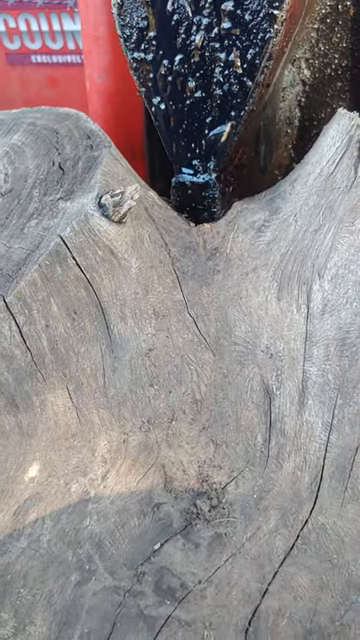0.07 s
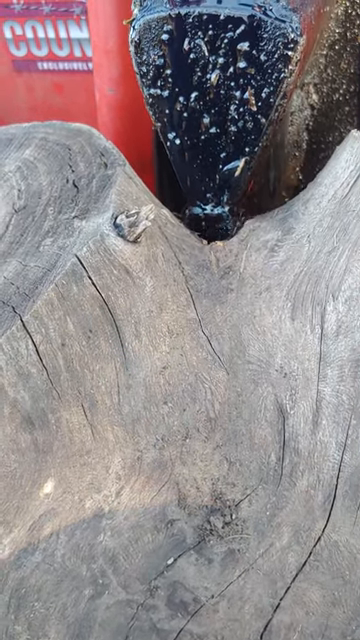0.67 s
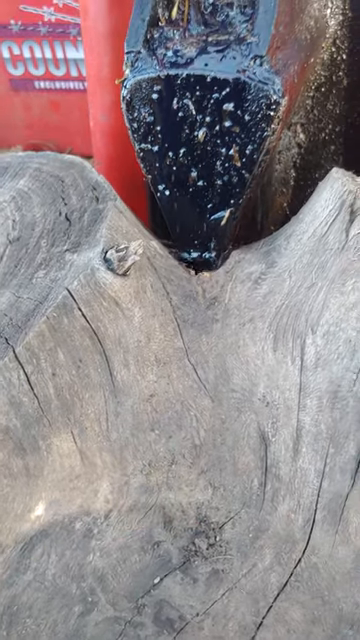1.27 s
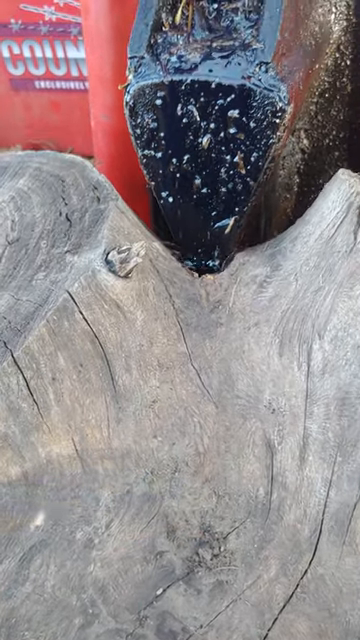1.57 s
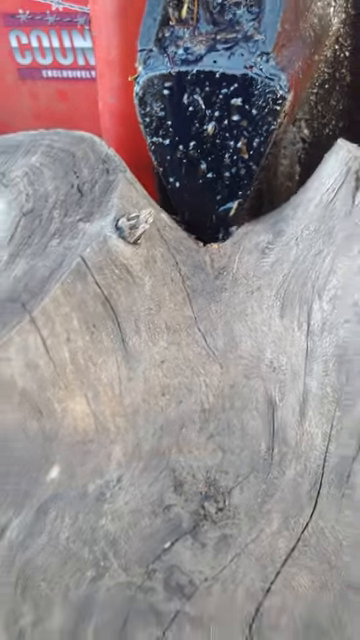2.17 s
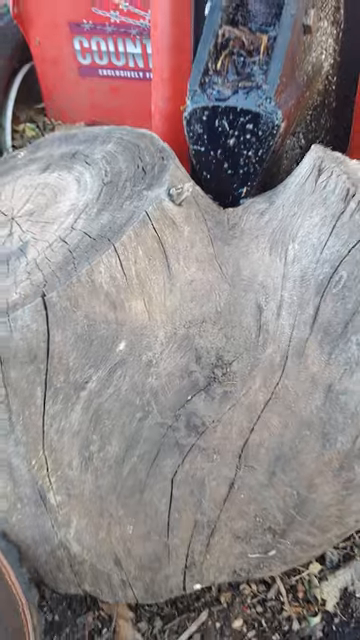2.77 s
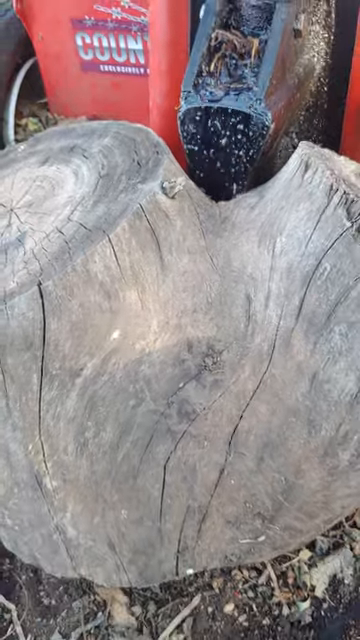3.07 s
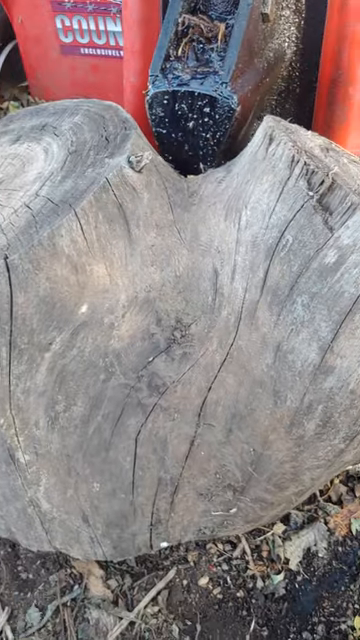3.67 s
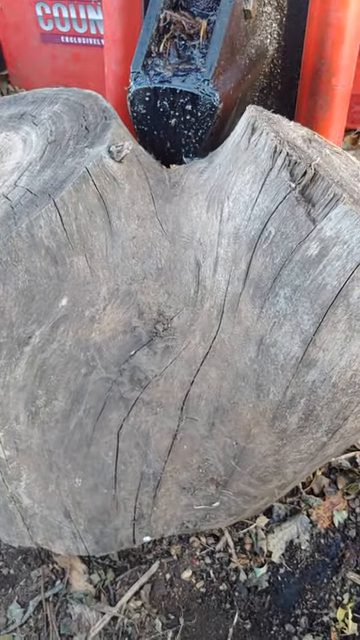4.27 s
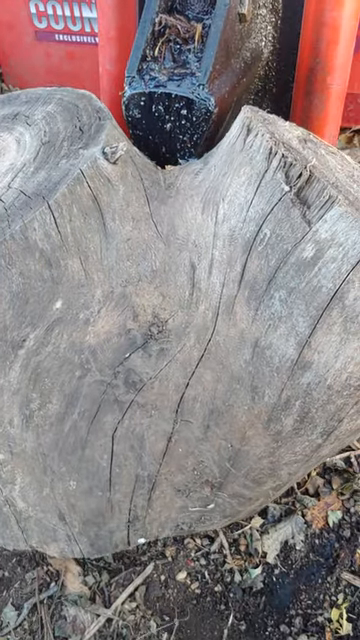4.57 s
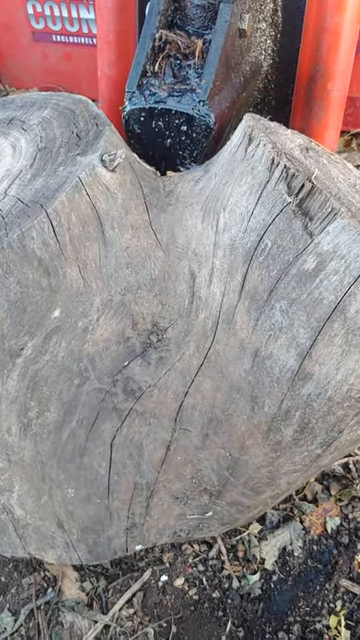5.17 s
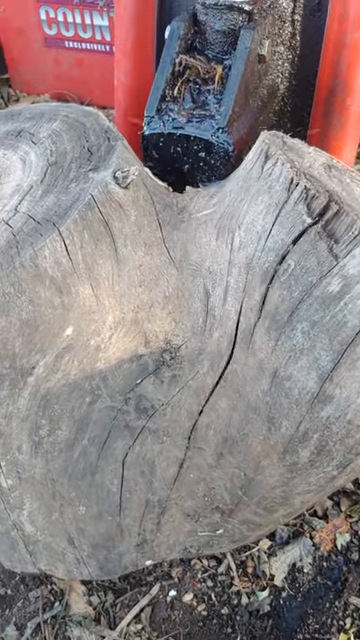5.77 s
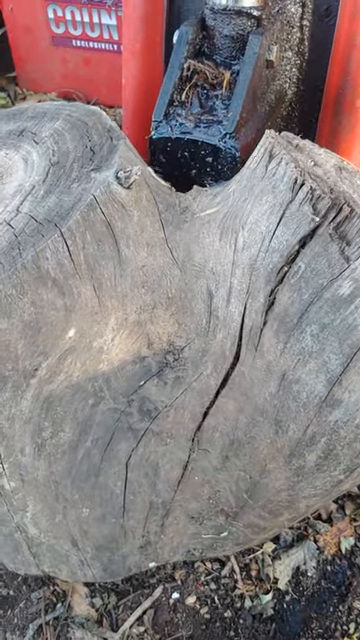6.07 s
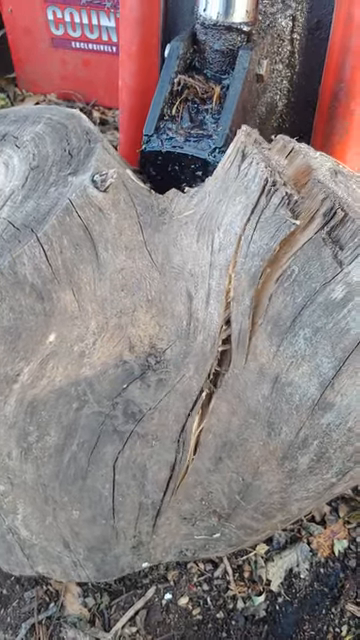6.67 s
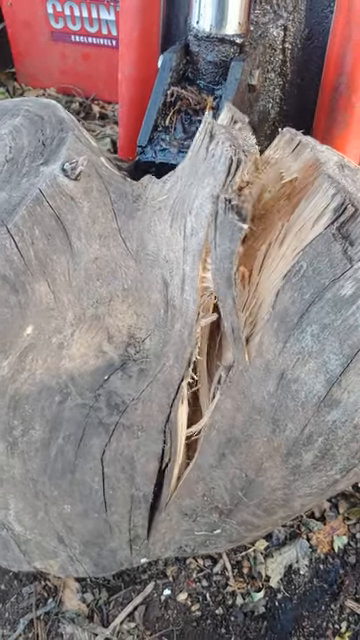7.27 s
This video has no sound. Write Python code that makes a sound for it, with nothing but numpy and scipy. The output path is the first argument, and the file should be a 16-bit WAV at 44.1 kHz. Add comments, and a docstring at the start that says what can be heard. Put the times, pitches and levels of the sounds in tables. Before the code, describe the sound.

A single-cylinder petrol engine runs close by outdoors from start to finish, a steady throbbing drone with mechanical clatter and a faint hydraulic pump whine. From the start, a dry log gives separate sharp cracks and small ticks as the splitter's wedge sinks in, clearest at about 0.4, 1.3, 3 and 4.2 seconds. Around 2.5 seconds the engine turns boomier and the whine recedes. At about 4.7 seconds a loud crack bursts the log open, and a dense crackle of snapping, tearing fibres follows. The whine rises again around 5.5 seconds. The loudest splintering crack and rip come at about 6.6 seconds, with more strong snaps and tearing from 6.8 seconds until the end, near 7.4 seconds. The biggest cracks briefly duck the engine, which then swells back.

```python
"""Petrol log splitter, close up

A single-cylinder engine drones and clatters outdoors, its hydraulic pump whining as the wedge sinks in.
The log gives single cracks, then bursts and tears with a dense crackle of snapping fibres.
Loud cracks make a limiter duck the engine, which swells back."""
import sys
import numpy as np
from scipy import signal
from scipy.fft import rfft, irfft, next_fast_len
from scipy.io import wavfile
from scipy.ndimage import uniform_filter1d, minimum_filter1d, map_coordinates

SR = 44100
rng = np.random.default_rng(int(sys.argv[2]) if len(sys.argv) > 2 else 0)


def log_audio(samples):
    """Write samples as a 16-bit WAV file to the path given in sys.argv[1]."""
    # one column per channel
    frames = np.atleast_2d(samples).T
    # limit to full scale, then quantise
    limited = np.clip(frames, -1, 1)
    pcm = np.round(limited * 32767).astype(np.int16)
    wavfile.write(sys.argv[1], SR, pcm)


N = 327222
BURST_S = 4.8  # the log bursts open


def amp(db):
    """Decibels to gain."""
    return 10 ** (np.asarray(db) / 20)


def unit(x):
    """Scale to rms 1."""
    return x / np.sqrt(np.mean(x ** 2) + 1e-20)


def along(points, hz):
    """Read (frequency, value) points on a log-frequency axis."""
    freqs, values = np.transpose(points)
    return np.interp(np.log(hz + 1), np.log(freqs + 1), values)


def automation(rows):
    """One lane, a value per sample, for each column after the time."""
    times, *lanes = np.transpose(rows)
    return [np.interp(np.arange(N) / SR, times, lane) for lane in lanes]


def wobble(rate):
    """Smooth random modulation, rate knots a second."""
    knots = rng.standard_normal(int(N * rate / SR) + 4)
    coarse = np.arange(0, N + 64, 64)
    return np.interp(np.arange(N), coarse, map_coordinates(knots, [coarse * rate / SR]))


def filtered(x, response):
    """Filter x by a gain given as a function of frequency."""
    n = x.shape[-1]
    padded = next_fast_len(n + n // 8)
    return irfft(rfft(x, padded) * response(np.fft.rfftfreq(padded, 1 / SR)), padded)[..., :n]


def eq(x, curve):
    """Shape x with a (frequency, level) curve."""
    return filtered(x, lambda hz: amp(along(curve, hz)))


def bell(hz, centre_hz, octaves):
    """A bell of height 1 on a log-frequency axis."""
    return np.exp(-.5 * (np.log2((hz + 1) / centre_hz) / octaves) ** 2)


# tone colour of the left channel, with a deep dip near 8 kHz: (frequency [Hz], gain [dB])
LEFT_EQ = [(60, 3), (200, 0), (400, -0.5), (700, 6.5), (1100, 3), (1900, -7.5), (3000, -4), (4400, -3.5),
           (5400, -1), (7000, -15), (8300, -40), (10000, -10.5), (11700, -5.5), (13500, -17)]
# tone colour of the right channel, with a peak near 7 kHz: (frequency [Hz], gain [dB])
RIGHT_EQ = [(60, -0.2), (200, 1.5), (400, 2), (700, -1.5), (1100, 3), (1900, 2), (3000, -1.5), (4300, 3.5),
            (5600, -3), (7200, 15), (8000, -1.5), (8800, -31), (10000, -1.5), (11500, 7.5)]
def channel_tone(hz):
    """Gains of the left and right channels."""
    return amp([along(LEFT_EQ, hz), along(RIGHT_EQ, hz)])


# likeness of left and right: (frequency [Hz], correlation [-1..1])
CORRELATION = [(150, 1), (350, 0.69), (700, 0.24), (1400, -0.15), (12000, 0.19)]
def width(hz):
    """Mid/side angle in radians: mono in the bass, wide above."""
    return np.arccos(np.clip(along(CORRELATION, hz), -1, 1)) / 2


def stereo(pair):
    """Two unrelated signals become mid and side; each channel then gets its own tone."""
    mid, side = filtered(pair, lambda hz: np.array([np.cos(width(hz)), np.sin(width(hz))]))
    return filtered(np.array([mid + side, mid - side]), channel_tone)


# exhaust note: (harmonic [x firing rate], relative level [dB])
EXHAUST_HARMONICS = [(1, -21), (2, -4.5), (3, -19), (4, -15), (5, 1.5), (6, -11.5), (7, -10), (8, -7),
                     (9, -17.5), (10, -14.5), (11, -16), (12, -7.5), (13, -33), (14, -21.5), (15, -11.5),
                     (16, -24), (17, -28), (18, -19.5), (19, -25), (20, -31.5), (21, -19.5), (22, -25.5),
                     (23, -53)]
def exhaust(cycle, mean_rate, boom_db, drone_db, level_db, smear_rad, waver_db):
    """Firing harmonics; the muffler delays high ones more, smearing each pulse over the cycle."""
    out = np.zeros((2, N))
    firing_strength = wobble(27)  # no two firings are equally strong
    for order, db in EXHAUST_HARMONICS:
        hz = order * mean_rate
        body_db = boom_db * bell(hz, 333, 0.34) + drone_db * bell(hz, 526, 0.2)
        waver = firing_strength + wobble(9) * hz / 300
        gain = amp(level_db + db + body_db + waver_db * waver)
        phase = 2 * np.pi * order * cycle - smear_rad * order ** 2
        apart = width(hz)  # higher harmonics reach left and right out of step
        out += channel_tone(np.array([hz])) * gain * np.sin([phase + apart, phase - apart])
    return out


# low engine noise: (frequency [Hz], relative level [dB])
RUSH_EQ = [(25, -22), (70, -5), (140, -2), (300, 1), (450, -3.5), (700, -12.5), (1000, -17.5), (2000, -49)]
def rush(cycle, level_db, throb_db):
    """A rough low rush that throbs once per firing."""
    noise = unit(stereo(eq(rng.standard_normal((2, N)), RUSH_EQ)))
    return noise * amp(level_db + throb_db * np.cos(2 * np.pi * cycle))


# engine cover resonances: (frequency [Hz], bandwidth [Hz], relative level [dB])
COVER_MODES = [(1320, 14, 13), (2310, 330, 0.5), (3370, 106, 1), (3860, 43, -1), (4590, 49, 5),
               (5800, 110, -4), (7300, 700, -35)]
def covers(hz):
    """Response of the ringing covers: resonators of alternating polarity."""
    return sum((-1) ** k * amp(db) * 1j * hz * band / (centre ** 2 - hz ** 2 + 1j * hz * band)
               for k, (centre, band, db) in enumerate(COVER_MODES))


# mechanical rattle: (frequency [Hz], relative level [dB])
CLATTER_EQ = [(450, -21), (700, -4), (830, -7), (1100, -8), (1500, -13.5), (2100, -3.5), (3000, -12.5),
              (3900, -10.5), (4600, -21.5), (5500, -23.5), (7100, -27.5), (8200, -31.5), (11500, -37),
              (16000, -53)]
def clatter(cycle, mean_rate, level_db, repeat, throb_db, ring_db):
    """Valve gear, piston and pump rattle nearly alike each cycle; fan air and ringing covers join in."""
    period = int(SR / mean_rate)
    loop = signal.resample(rng.standard_normal((2, period)), 4 * period, axis=1)
    playhead = (cycle % 1 * loop.shape[1]).astype(int)
    looped = loop[:, playhead] * amp(1.03 * wobble(30))
    loop_share = lambda hz: repeat / (1 + (hz / 3200) ** 2)
    fan_air = filtered(rng.standard_normal((2, N)), lambda hz: np.sqrt(1 - loop_share(hz)))
    rattle = filtered(looped, lambda hz: np.sqrt(loop_share(hz))) + fan_air
    throb = np.cos(2 * np.pi * cycle) + np.cos(4 * np.pi * cycle)  # one firing, two crank turns
    rattle *= amp(throb_db * throb + 1.1 * wobble(160))
    ring = amp(ring_db) * unit(filtered(rattle[::-1], covers))
    return amp(level_db) * unit(stereo(unit(eq(rattle, CLATTER_EQ)) + ring))


# whine riding the pump's load: (time [s], level [dB])
PUMP_LOAD = [(0, -26), (2.4, -27.5), (2.9, -35), (5.3, -39.5), (5.6, -24.5), (6.3, -29), (7.0, -23)]
# gear mesh, sidebands and octave: (harmonic [x firing rate], relative level [dB])
GEAR_TONES = [(24, 0), (25, -9), (26, -7), (27, -15), (48, -19)]
def pump(cycle, flutter_db):
    """Twelve gear teeth mesh on each of a cycle's two crank turns, louder as the oil pressure rises."""
    whine_db, = automation(PUMP_LOAD)
    whine = sum(amp(db + flutter_db * wobble(30)) * np.sin(2 * np.pi * order * cycle)
                for order, db in GEAR_TONES)
    return filtered(amp(whine_db) * whine, channel_tone)


def close_notch(x, boom_db, notch_hz, octaves, depth):
    """Near the wedge, where the boom is weak, a narrow band of machine noise dips too."""
    closeness = np.clip(boom_db / boom_db.min(), 0, 1)
    return x - depth * closeness * filtered(x, lambda hz: bell(hz, notch_hz, octaves))


# governed engine speed: (time [s], firing rate [Hz])
FIRING_RATE = [(0.0, 27.4), (0.16, 27.4), (0.58, 27.2), (1.14, 27.5), (1.45, 27.0), (1.71, 27.4),
               (1.92, 27.4), (2.0, 27.2), (3.08, 27.1), (3.22, 27.3), (3.37, 27.0), (5.04, 27.0),
               (6.65, 27.7), (6.82, 27.9), (7.15, 27.0), (7.34, 27.0), (7.42, 27.6)]
# the microphone steps back once: (time [s], frame boom [dB], housing drone [dB], clatter [dB])
PERSPECTIVE = [(0, -6.5, 8, -25), (2.4, -7, 8, -25.5), (2.8, 2.5, 1.5, -24.5), (7.4, 2, -4.5, -24.5)]
def engine():
    """A governed four-stroke: exhaust, rush, clatter and pump all lock to its firing cycle."""
    rate, = automation(FIRING_RATE)
    mean_rate = np.mean(FIRING_RATE, axis=0)[1]
    boom_db, drone_db, clatter_db = automation(PERSPECTIVE)
    cycle = np.cumsum(rate * (1 + .0012 * wobble(20))) / SR
    note = exhaust(cycle, mean_rate, boom_db, drone_db, level_db=-13, smear_rad=.62, waver_db=0.69)
    machine = rush(cycle, level_db=-29.5, throb_db=3)
    machine += clatter(cycle, mean_rate, clatter_db + 4, repeat=0.81, throb_db=0.45, ring_db=-10.5)
    machine += pump(cycle, flutter_db=1.5)
    return note + close_notch(machine, boom_db, notch_hz=756, octaves=0.12, depth=0.54)


# the log's brief ring: (frequency [Hz], relative level [dB], 60 dB decay [s])
LOG_MODES = [(1575, -6.5, 0.036), (2067, -7.5, 0.052), (2470, -4, 0.081), (3406, 0.5, 0.048),
             (4370, -1, 0.016)]
def log_ring(t, level_db):
    """Each splinter has its own size and strikes the damped log's modes anew."""
    detune = np.exp(0.032 * rng.standard_normal())
    ring = np.zeros((2, len(t)))
    for hz, db, t60 in LOG_MODES:
        strike_db = level_db + db + 4.2 * rng.standard_normal((2, 1))
        ring += amp(strike_db - 60 * t / t60) * np.sin(2 * np.pi * hz * detune * t)
    return ring * rng.choice([-1, 1], (2, 1))


# breaking wood: (frequency [Hz], relative level [dB])
WOOD_EQ = [(150, 2), (600, -0.5), (1200, -1.5), (2000, 6), (3200, -2), (4400, -1), (5600, -8.5),
           (7200, -6.5), (11500, -14), (16000, -18.5)]
PRE_ROLL = SR // 200  # samples of room before each attack
def crack(force_db, centre_hz, focus_db, knock_db, tail_db, tail_t60, drive):
    """A short run of snapping fibres rings the log; the steel frame answers with a faint tail."""
    t = np.arange(SR // 5) / SR
    delayed = lambda x: np.pad(x, ((0, 0), (PRE_ROLL, 0)))
    burst = lambda envelope: delayed(envelope * rng.standard_normal((2, len(t))))
    t60 = 0.033 * (3000 / centre_hz) ** 1.75  # thinner splinters sound higher and stop sooner
    jagged_db = 5 * unit(uniform_filter1d(rng.standard_normal(len(t)), size=24))
    depth = np.clip(force_db / 18, 0, 1) * 2500 / centre_hz  # a big, low crack knocks the whole log
    colour = lambda hz: amp(along(WOOD_EQ, hz) + focus_db * bell(hz, centre_hz, 0.89)
                            + knock_db * depth * bell(hz, 550, 0.58))
    ring = delayed(log_ring(t, level_db=-18.5))
    snap = filtered(burst(amp(jagged_db - 60 * t / t60)) + ring, colour)
    tail = burst(amp(tail_db + 5 * depth - 60 * t / tail_t60))
    tail = filtered(tail, lambda hz: colour(hz) / (1 + (hz / 3500) ** 2))
    hit = stereo(snap + tail)
    hit /= np.sqrt(uniform_filter1d(hit ** 2, size=110, axis=1).max())
    return np.tanh(drive * hit)  # rounds off the sharpest spikes


def small_cracks(start_s, end_s, mean_db, count):
    """Cues for small cracks, one in each equal slot of the span, scattered in level and pitch."""
    when, size, pitch = rng.random((count, 3)).T
    times = start_s + (end_s - start_s) * (np.arange(count) + when) / count
    levels_db = mean_db + 3.5 * (2 * size - 1)
    centres_hz = 3560 * 2 ** (0.3 * (2 * pitch - 1))
    return list(zip(times, levels_db, centres_hz))


# the main cracks: (time [s], relative level [dB], centre frequency [Hz])
CRACK_CUES = [(0.018, -3.5, 3300), (0.363, 7.5, 4400), (0.848, 2, 2140), (0.999, 2.5, 2900),
              (1.270, -1, 2580), (1.277, 7.5, 2870), (1.569, 4.5, 3070), (1.644, -2.5, 2900),
              (1.724, -3, 4200), (2.019, 0.5, 2700), (2.792, -5, 2400), (3.019, 6, 2680), (3.334, 3, 2400),
              (3.973, -4, 2980), (4.155, 5, 2430), (4.740, 4, 2510), (4.745, 17.5, 2100),
              (4.863, 10.5, 2680), (4.897, 3.5, 5570), (4.922, 3, 3070), (4.967, 5.5, 3870),
              (4.985, 10, 2800), (5.027, 6, 3420), (5.061, 0.5, 2800), (5.084, 1.5, 3000),
              (5.256, 7.5, 3220), (5.311, 2.5, 3100), (5.374, 9, 4240), (5.453, -3, 2200), (5.460, 8, 2800),
              (5.490, 6.5, 3300), (5.537, 9.5, 3270), (5.554, 2.5, 3600), (5.575, 8, 4280),
              (5.625, 11, 3800), (5.644, 8.5, 3300), (5.689, 13.5, 3600), (5.726, 3, 2860),
              (5.825, 3, 3800), (5.833, 11.5, 2400), (5.896, 5, 2810), (5.922, 1, 2400), (6.016, 4, 4900),
              (6.074, 7, 3360), (6.270, 10.5, 4240), (6.333, 7.5, 4550), (6.371, 9.5, 4250),
              (6.390, -1, 3800), (6.426, 8, 2500), (6.454, 3, 1980), (6.556, 18, 3720), (6.569, 22.5, 3000),
              (6.605, 15, 3900), (6.848, 16, 4100), (6.887, 6, 4500), (6.902, 15.5, 3900),
              (6.999, 13, 5770), (7.044, 16.5, 3700), (7.055, 18, 3040), (7.125, 7, 4100),
              (7.154, 8.5, 4100), (7.184, 10.5, 2400), (7.192, 15, 2950), (7.289, 10.5, 3160),
              (7.333, 7.5, 3640)]
def splitting(gain_db):
    """The wedge cracks the log, with faint ticks as it sinks in and splinters once the log is open."""
    out = np.zeros((2, N + SR))
    ticks = small_cracks(0, BURST_S, mean_db=-9, count=9)
    splinters = small_cracks(BURST_S, N / SR, mean_db=-3.5, count=24)
    for at, db, centre_hz in list(CRACK_CUES) + ticks + splinters:
        hit = crack(db, centre_hz, focus_db=13, knock_db=10.5, tail_db=-18.5, tail_t60=0.34, drive=0.23)
        start = max(round(at * SR) - PRE_ROLL, 0)
        out[:, start:start + hit.shape[1]] += amp(db + gain_db) * hit
    return out[:, :N]


# whole bundles of fibres rip: (peak time [s], relative level [dB], half width [s])
RIP_CUES = [(3.1, -36, 0.041), (5.71, -30.5, 0.14), (6.596, -11.5, 0.015), (7.154, -18.5, 0.04),
            (7.31, -24, 0.041)]
def tear_envelope():
    """Brief swells for the rips, plus a nearly steady bed from the burst onward."""
    t = np.arange(N) / SR
    bed = (t > BURST_S) * amp(np.interp(t, [BURST_S, BURST_S + 1], [-31.5, -32]))
    return bed + sum(amp(db) * np.exp(-.5 * ((t - at) / half) ** 2) for at, db, half in RIP_CUES)


# tearing fibres: (frequency [Hz], relative level [dB])
FIBRE_EQ = [(500, -24), (1500, -0.5), (2500, 2), (4200, 1), (5600, -5), (7200, -6.5), (11500, -11),
            (16000, -23)]
def tearing(gain_db, per_second, spread_db, t60):
    """Countless small fibres snap at random as the split opens, each a decaying grain of noise."""
    sizes = amp(spread_db * np.minimum(rng.exponential(size=N), 3))
    snaps = (rng.random(N) < per_second / SR) * sizes
    t = np.arange(SR // 20) / SR
    power = np.abs(signal.fftconvolve(snaps ** 2, amp(-60 * t / t60) ** 2)[:N])
    grains = np.sqrt(power) * rng.standard_normal((2, N))
    return amp(gain_db) * tear_envelope() * unit(stereo(eq(grains, FIBRE_EQ)))


def scene():
    """The engine bed behind the cracking, tearing log."""
    cracks = splitting(gain_db=5.5)
    return engine() + cracks + tearing(gain_db=9.5, per_second=210, spread_db=3.5, t60=0.019)


def limiter(x, ceiling_db, recovery_per_s):
    """Loud moments pull the gain down at once; it climbs back in a straight line."""
    level = np.sqrt(np.abs(uniform_filter1d(x ** 2, size=25, axis=1)).max(axis=0))
    needed = np.minimum(1, amp(ceiling_db) / (level + 1e-9))
    ramp = recovery_per_s * np.arange(N) / SR
    gain = np.minimum.accumulate(minimum_filter1d(needed, size=45) - ramp) + ramp
    return x * uniform_filter1d(gain, size=33)


def record(dry):
    """Master chain: limiter, a soft clip on the spikes that slip through, and a high cut."""
    sound = limiter(dry, ceiling_db=-3.5, recovery_per_s=0.98)
    sound /= (1 + sound ** 8) ** (1 / 8)
    return filtered(sound, lambda hz: hz < 16000)


dry = scene()
out = record(dry)
log_audio(out)
```